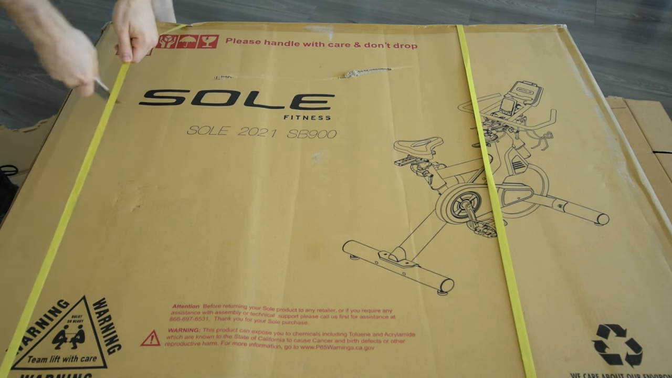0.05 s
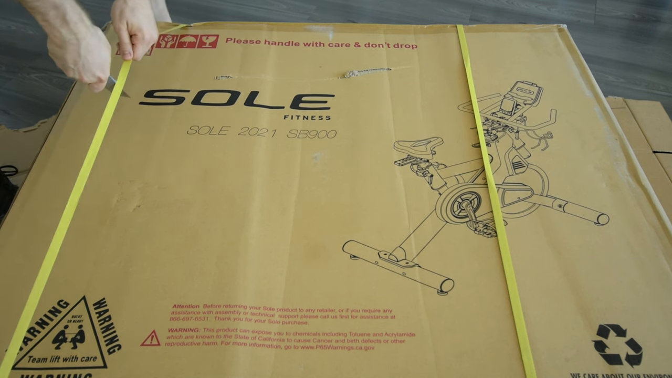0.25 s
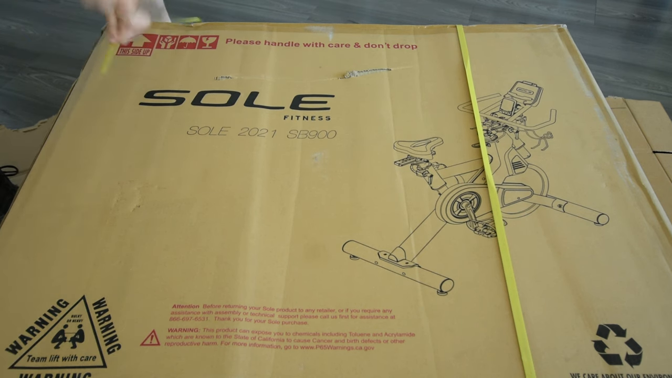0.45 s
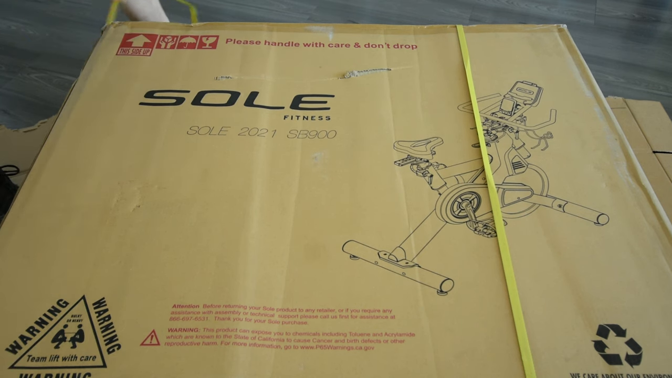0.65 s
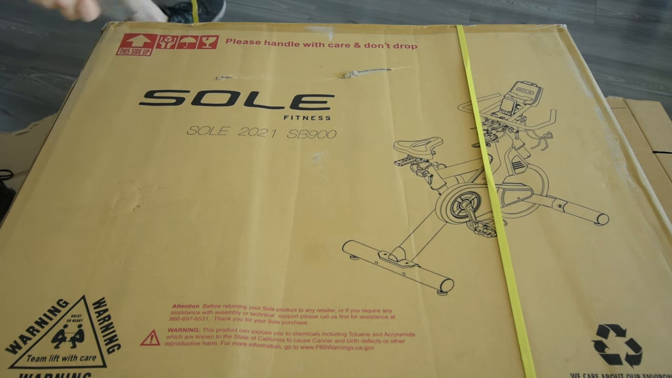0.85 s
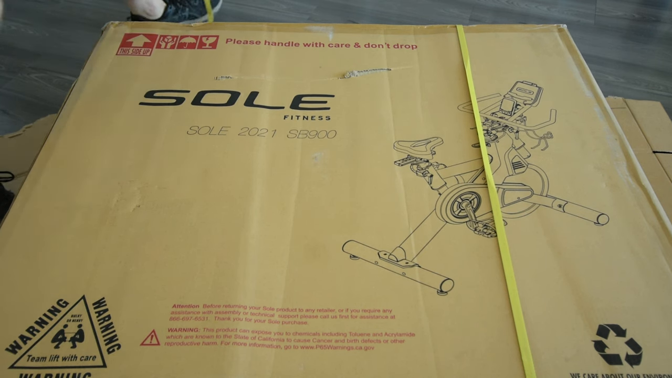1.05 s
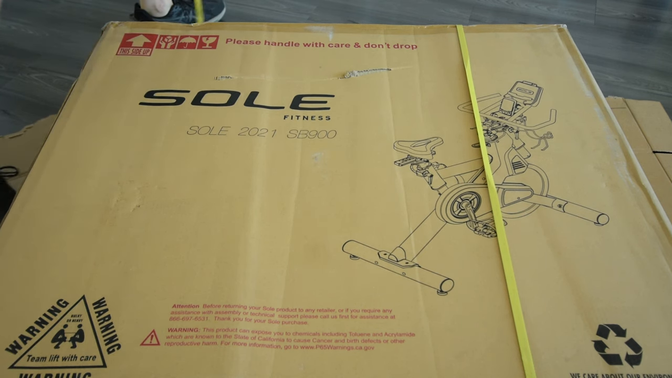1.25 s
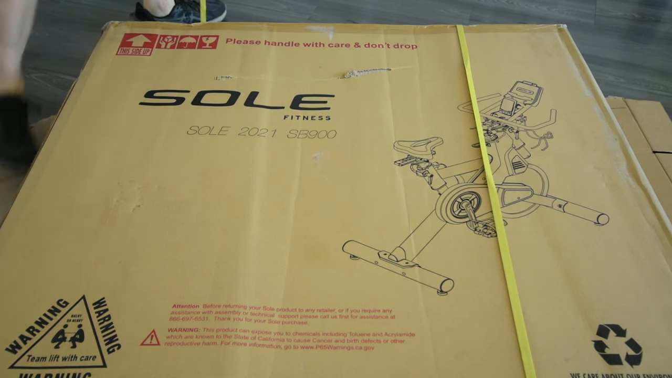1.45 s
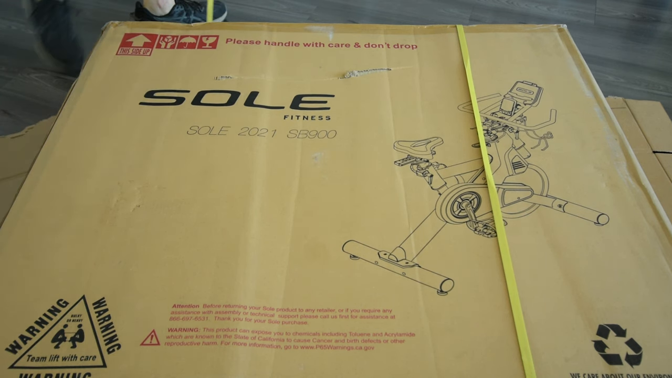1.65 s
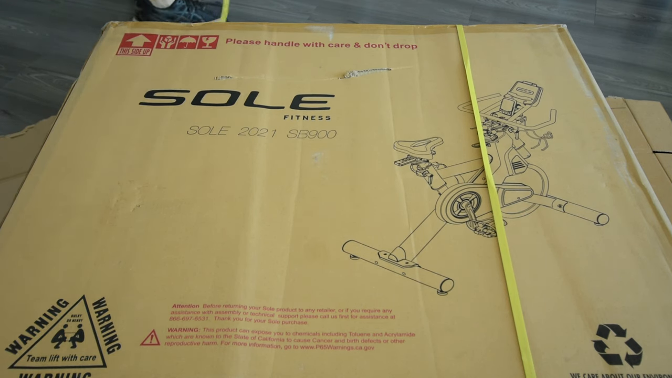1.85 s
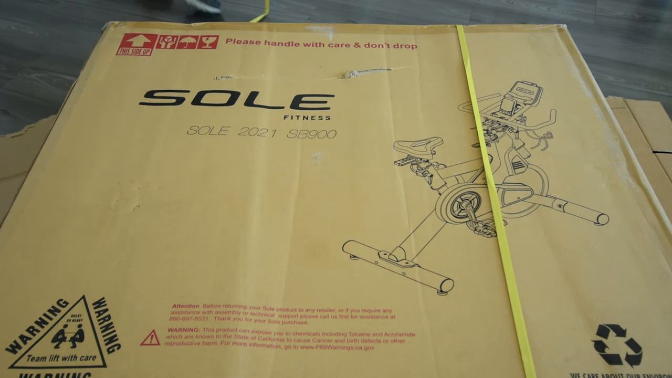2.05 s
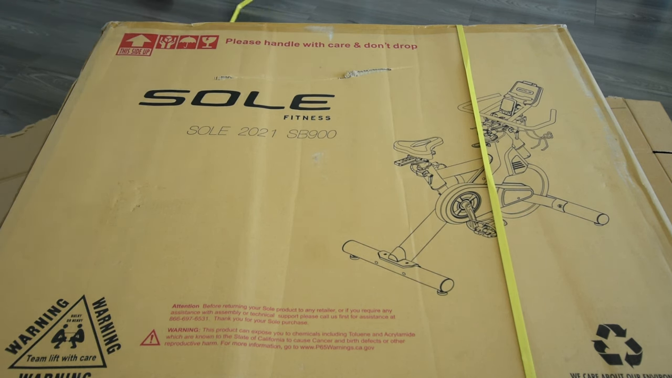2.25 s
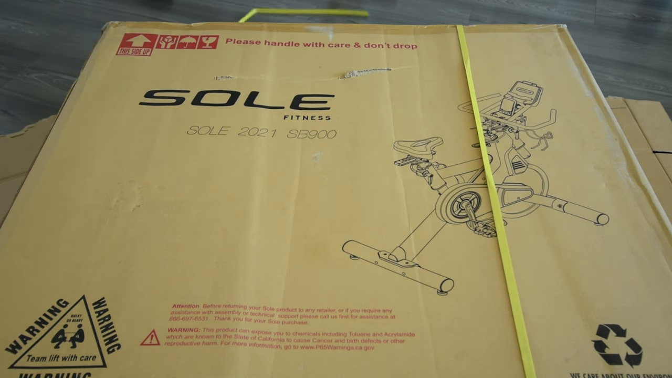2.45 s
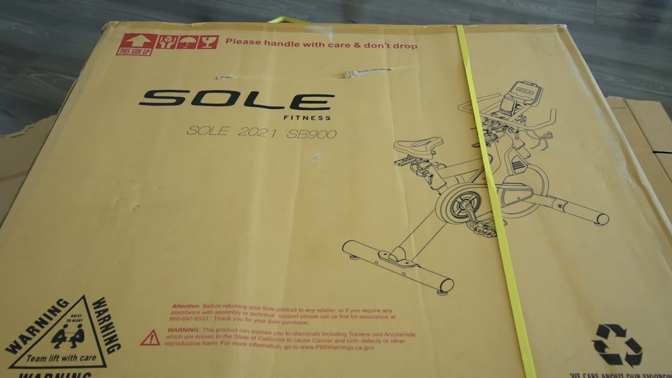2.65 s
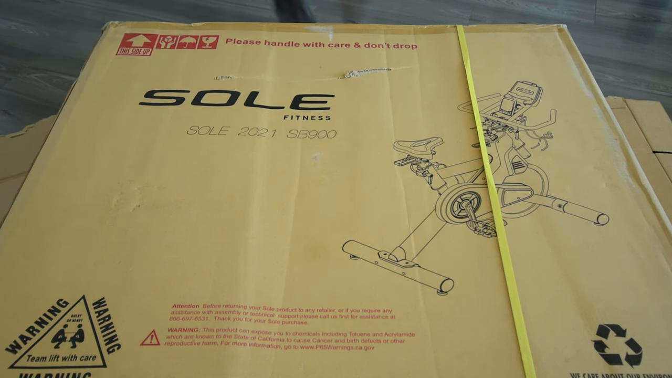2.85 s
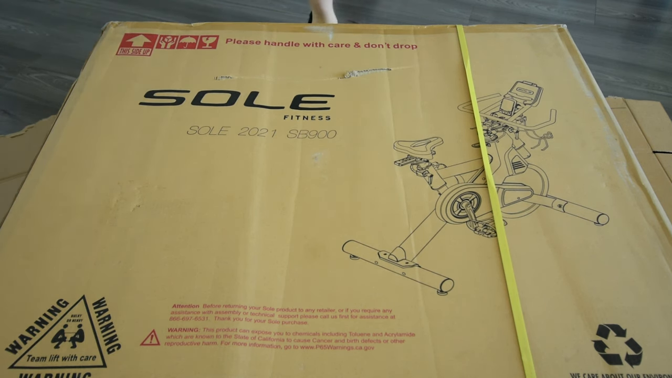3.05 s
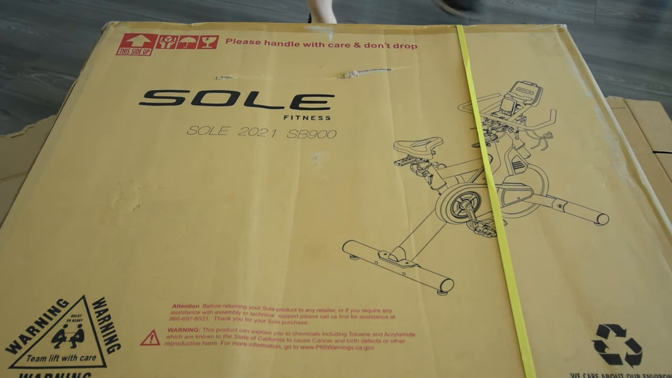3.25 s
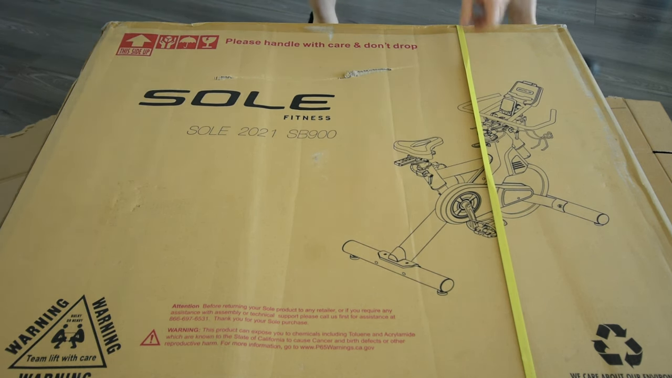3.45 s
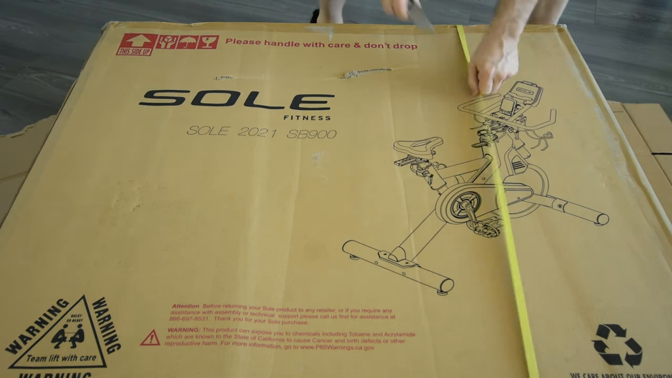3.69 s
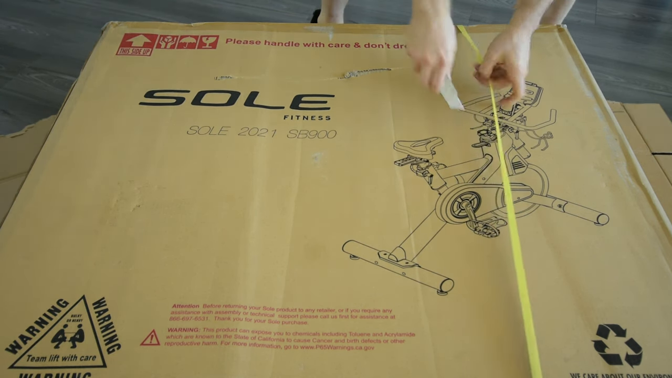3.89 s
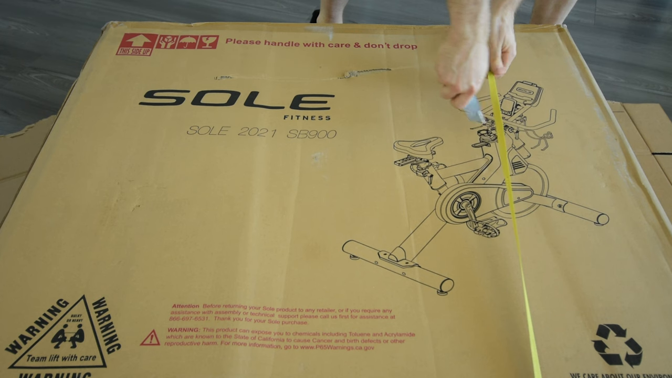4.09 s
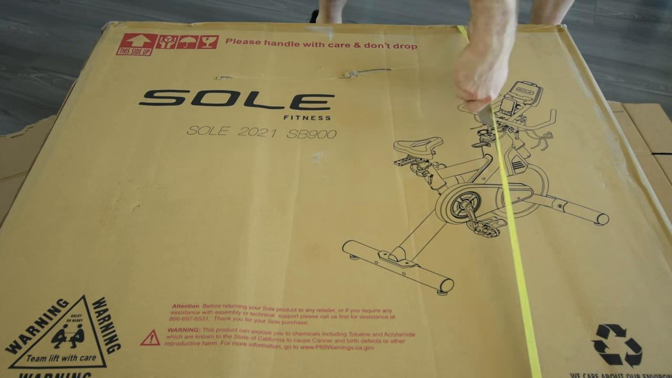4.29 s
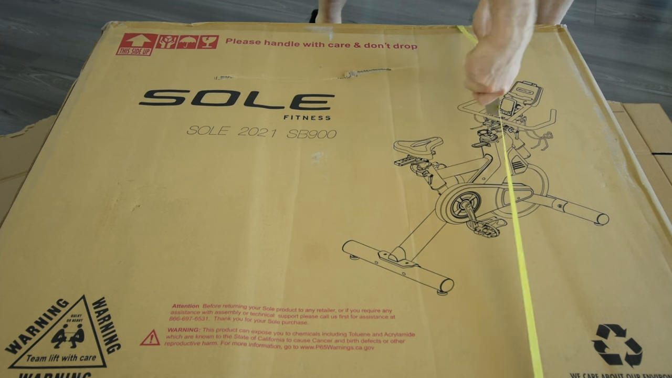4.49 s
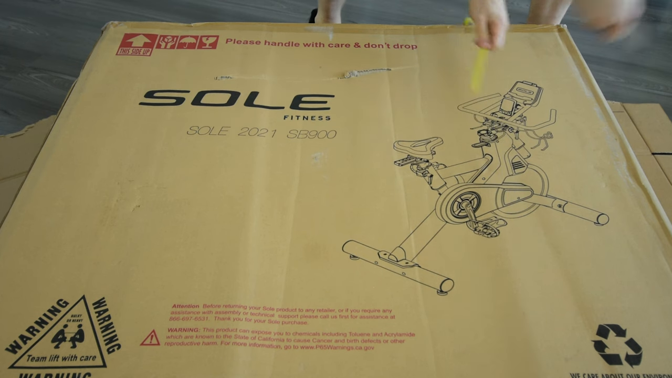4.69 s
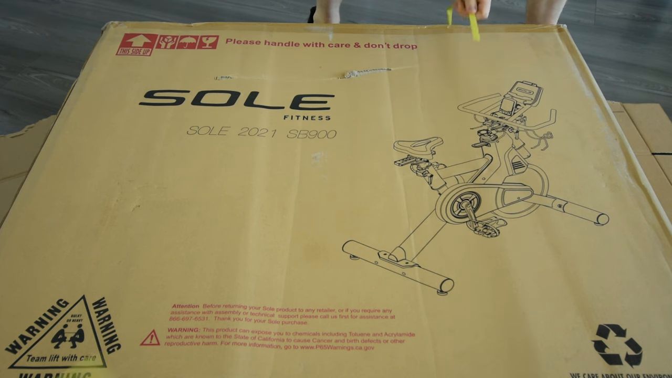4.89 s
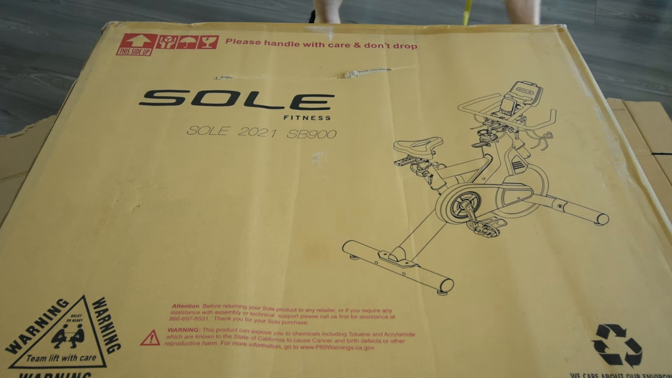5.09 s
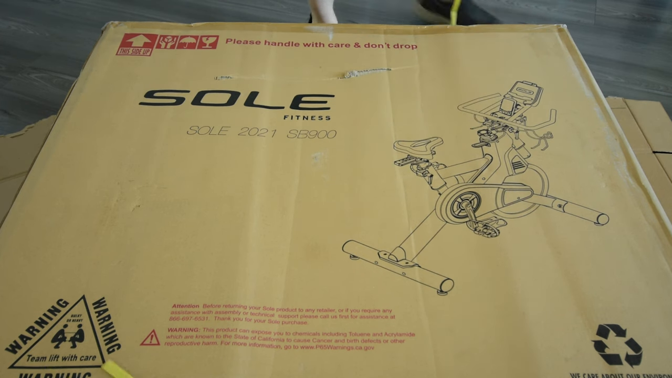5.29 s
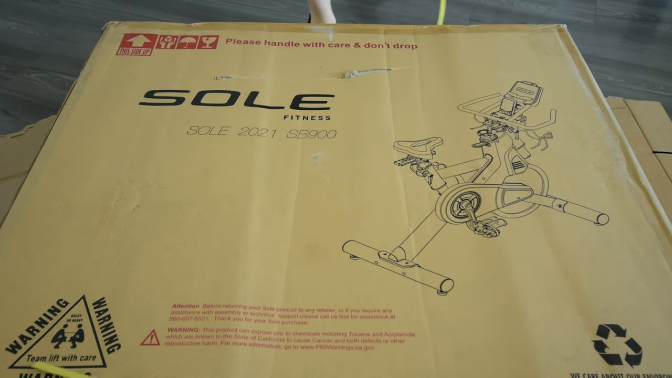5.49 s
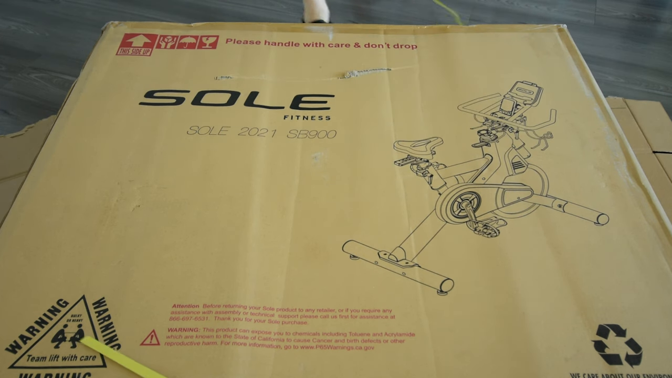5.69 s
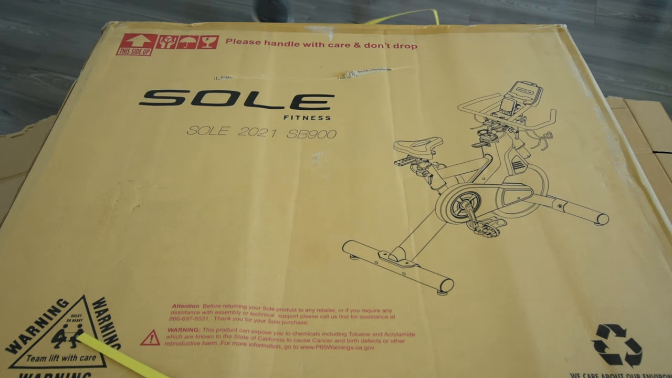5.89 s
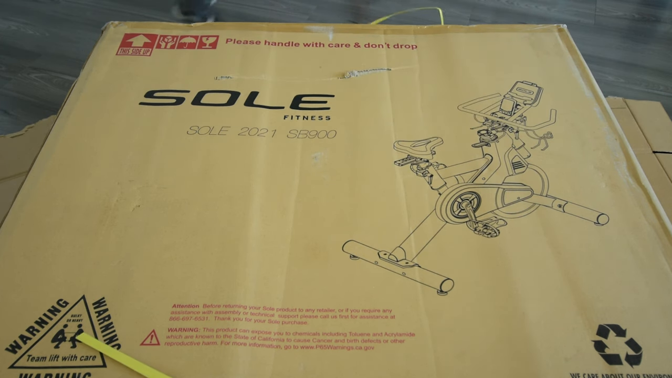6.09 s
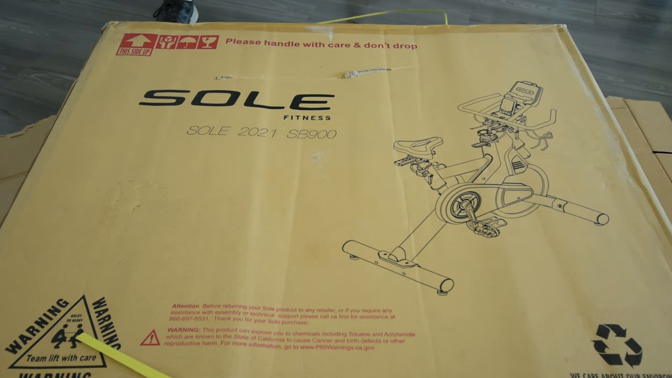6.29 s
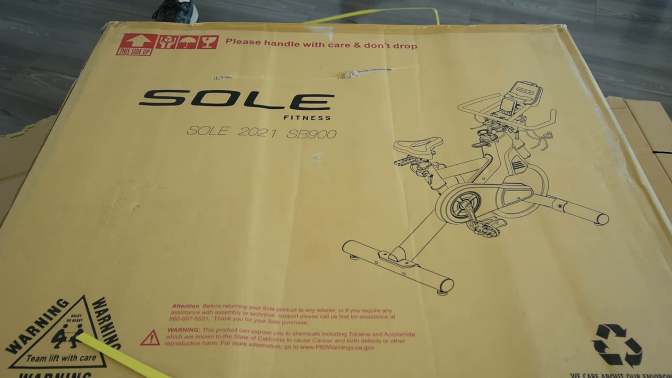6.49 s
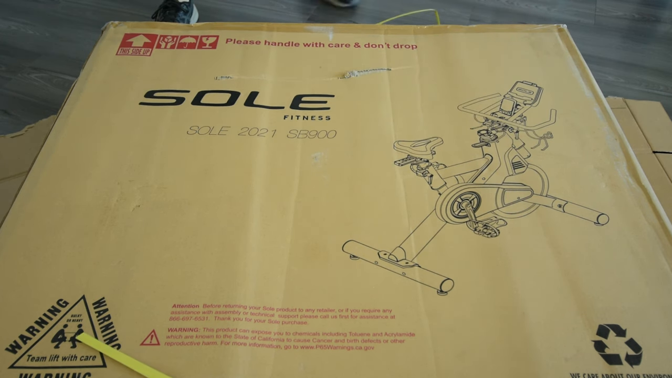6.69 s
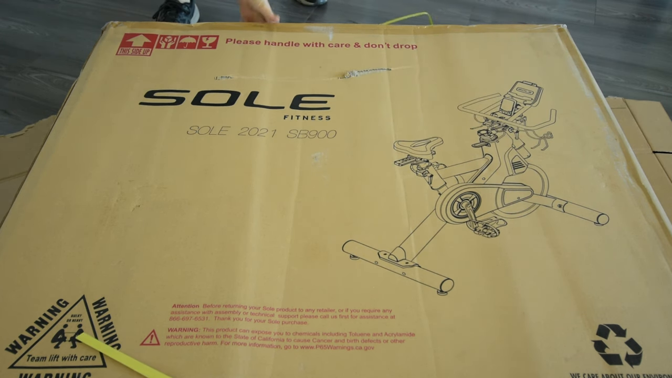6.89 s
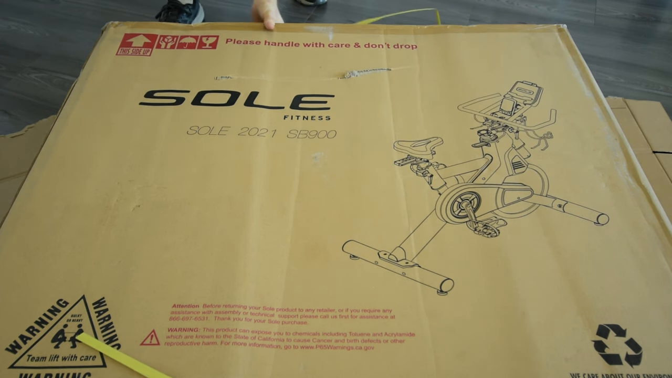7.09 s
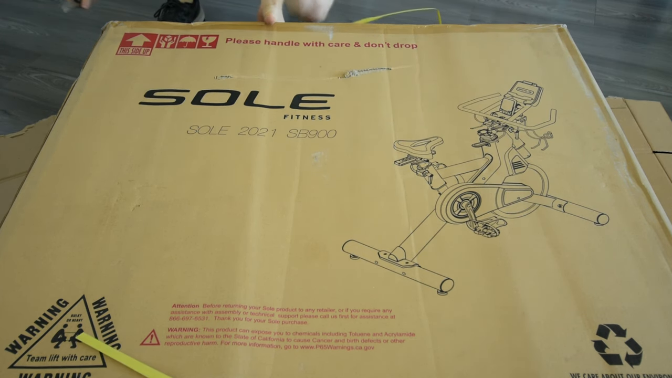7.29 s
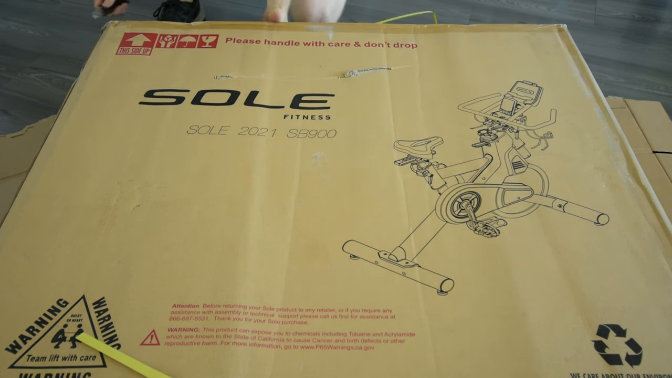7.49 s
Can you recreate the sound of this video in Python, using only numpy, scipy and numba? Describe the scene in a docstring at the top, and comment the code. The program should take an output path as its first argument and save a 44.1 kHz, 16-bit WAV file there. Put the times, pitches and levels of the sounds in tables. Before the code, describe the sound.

Two taut plastic packing straps are cut and snap hard against a large cardboard box in a ringing room, with scrapes, ticks and a dragged strap between.

```python
"""A fan's narrow hum and low rumble are heard first, then the ticks of loose ends of a plastic strap.
Two taut straps round a large cardboard box are cut with a knife and lash the box: noise bursts and box modes.
Straps drag, one is hauled from under the box, soles step and a palm brushes past: friction noise in resonances.
A bare, ringing room adds a diffuse tail; one microphone with a limiter ducks under each snap."""
import sys
import numpy as np
from scipy import signal
from scipy.fft import rfft, irfft, next_fast_len
from scipy.io import wavfile
from scipy.ndimage import uniform_filter1d, minimum_filter1d
from numba import njit

SR = 44100
rng = np.random.default_rng(int(sys.argv[2]) if len(sys.argv) > 2 else 0)


def generate_wav(sig):
    """Save sig (samples, or channels by samples) to the path in sys.argv[1] as 16-bit PCM at SR."""
    pcm = np.round(np.clip(np.atleast_2d(sig).T, -1, 1) * 32767).astype(np.int16)
    wavfile.write(sys.argv[1], SR, pcm)


N = 332758

# modes of the cardboard box: nominal [f/Hz, relative level/dB, t60/s]
BOX_MODES = [(105, -13, 0.21), (176.7, -6.5, 0.12), (244, 2.5, 0.057), (302, 0, 0.081), (380, 5, 0.057),
             (458, -1, 0.052), (564.5, -3, 0.083), (650, -7.5, 0.041)]
# resonances of the air in the box, nominal: [f/Hz, width/Hz, relative level/dB]
HOLLOW = [(258, 136, -7), (302, 49, 3), (355, 8.5, -1)]
# straps and soles slide in swells: [peak t/s, swell/s, hiss level/dB, hiss f/Hz,
# rasp level/dB, rasp f/Hz, box rumble level/dB]
SLIDES = [(.15, 0.028, -72, 4000, -57.5, 1500, -58), (.79, 0.017, -51.5, 10100, -61, 1140, -55),
          (0.902, 0.051, -39, 5900, -49, 1300, -49), (1.05, 0.045, -46, 6300, -57, 1630, -74),
          (1.15, 0.041, -47.5, 7400, -59, 1481, -72), (1.42, 0.15, -59.5, 4800, -66, 1200, -65),
          (2.231, 0.038, -40, 8300, -42, 806, -44), (2.62, 0.025, -52, 3900, -70, 930, -51),
          (2.84, 0.16, -53, 3250, -55.5, 1920, -63), (3.581, 0.048, -41, 3900, -60, 1300, -41),
          (3.75, 0.072, -43.5, 5800, -72, 1800, -44), (3.85, 0.0071, -44, 9000, -76, 900, -33.5),
          (3.97, 0.059, -42, 5500, -85, 680, -39), (4.29, 0.024, -53.5, 9000, -72, 800, -51),
          (4.45, 0.062, -61, 4000, -78, 800, -44.5), (4.58, 0.079, -41, 4490, -65, 1220, -48),
          (5.09, 0.073, -40.5, 4230, -57, 1110, -34.5), (5.31, 0.056, -47, 4140, -57, 880, -47.5),
          (5.5, 0.065, -38.5, 7500, -54, 1300, -50), (5.72, 0.022, -57, 5000, -45.5, 650, -63),
          (5.97, 0.064, -78, 6200, -60, 1580, -57), (6.3, 0.037, -75, 3500, -49, 680, -71),
          (6.59, 0.017, -52, 4000, -39, 1300, -47), (6.629, 0.024, -48.5, 3900, -35.5, 1000, -47.5),
          (6.7, .03, -41.5, 3300, -39.5, 1090, -40), (7.27, 0.03, -43, 3500, -42.5, 1890, -52),
          (7.4, 0.052, -47.5, 6280, -90, 770, -51.5), (7.54, 0.022, -40, 5250, -49, 740, -57)]


def undb(db):
    """Level law: amplitude ratio of a value in dB."""
    return 10 ** (np.asarray(db) / 20)


def unit(x):
    """Power normalisation: scaled to rms 1."""
    return x / np.sqrt(np.mean(x ** 2))


def colour(x, points):
    """Linear filtering in the frequency domain: [f/Hz, level/dB] points joined on a log-frequency axis."""
    hz, db = np.transpose(points)
    size = next_fast_len(len(x))
    f = np.maximum(np.arange(size // 2 + 1) * SR / size, 1)
    gain = undb(np.interp(np.log(f), np.log(hz), db))
    return irfft(rfft(x, size) * gain, size)[:len(x)]


def band(x, hz, width_hz):
    """Simple resonator: two poles, gain 1 at the centre."""
    return signal.lfilter(*signal.iirpeak(min(hz, .45 * SR), hz / width_hz, fs=SR), x)


def steep(x, hz, width_hz):
    """Resonators in cascade: the same one applied twice for steeper skirts."""
    return band(band(x, hz, width_hz), hz, width_hz)


@njit
def sweep(x, hz, sharp):
    """State-variable resonator: a band-pass whose centre moves; width = centre / sharp."""
    y, b, l = np.empty(len(x)), 0., 0.
    for i in range(len(x)):
        g = np.tan(np.pi * hz[i] / SR)
        v = (b + g * (x[i] - l)) / (1 + g * (g + 1 / sharp))
        b, l, y[i] = 2 * v - b, l + 2 * g * v, v / sharp
    return y


def steep_sweep(x, hz, sharp):
    """Moving resonators in cascade: the same sweep applied twice."""
    return sweep(sweep(x, hz, sharp), hz, sharp)


def walk(rate):
    """Slow random modulation: levels held 1 / rate s and smoothed twice; spread about 0.5."""
    k = int(SR / rate)
    held = np.repeat(rng.standard_normal(N // k + 1), k)
    return 0.74 * uniform_filter1d(uniform_filter1d(held, k), k)[:N]


def swell(s, rise_s, fall_s, t=np.arange(N) / SR):
    """Gaussian envelope: bell-shaped gain at times t with its top at s."""
    return np.exp(-.5 * ((t - s) / np.where(t < s, rise_s, fall_s)) ** 2)


def grains(grain_db, flutter_db):
    """Stick-slip friction: noise in grains of 40 samples (about 1 ms), uneven in size, under a quick flutter."""
    size_db = grain_db * np.repeat(rng.exponential(size=N // 40 + 1), 40)[:N]
    return rng.standard_normal(N) * undb(size_db + flutter_db * walk(40))


AIR_DB, RUMBLE_DB = -51, -45
HUM_HZ, HUM_WIDTH_HZ, HUM_DB = 221.9, 19.3, -49.5  # width of each of two passes


def air():
    """Stationary noise: room tone, building rumble and a fan's hum that wavers as narrow-band noise does."""
    # room tone spectrum: [f/Hz, relative level/dB per Hz]
    tone_spectrum = [(150, -8), (270, -9), (400, -11), (600, -13), (1200, -23), (4000, -28), (9000, -33.5),
                     (13000, -31), (16000, -31)]
    # building rumble spectrum: [f/Hz, relative level/dB per Hz]
    rumble_spectrum = [(12, -48), (20, 15.5), (65, 1), (77, -6.5), (86, -48), (103, -7), (141, -51),
                       (190, -16), (250, -55), (420, -120)]
    hum = steep(rng.standard_normal(N), HUM_HZ, HUM_WIDTH_HZ)
    tone = unit(colour(rng.standard_normal(N), [(75, -55)] + tone_spectrum))
    rumble = unit(colour(rng.standard_normal(N), rumble_spectrum + [(400, -75)]))
    return undb(AIR_DB + 0.38 * walk(1.0)) * tone + undb(RUMBLE_DB) * rumble + undb(HUM_DB) * unit(hum)


SLIDE_RISE = 0.75  # a slide sets in faster than it dies away


def slide_levels(t):
    """Superposed envelopes: gains of hiss, rasp and rumble at times t, summed over the swells."""
    swells = np.array([swell(s, SLIDE_RISE * w, w, t) for s, w, *_ in SLIDES])
    return undb(np.transpose(SLIDES)[2::2]) @ swells


TICK_SLAP_HZ, TICK_THUD_DB = 2240, -13  # a tick slaps high on the cardboard; its thud is set below the slap
KNOCK_EDGE_HZ = 2600
BITE_HZ, BITE_SLAP_DB = 4130, -17  # slap level relative to the crack
CRACKLE_PER_S, CRACKLE_DB, CRACKLE_SCATTER_DB = 4, 11, 2.5  # sliding strap, levels relative to its hiss


def small_blows():
    """Impulsive excitation: ticks, knocks, bites and chance crackle.
    Rows are (t/s, crack dB, crack Hz, slap dB, slap Hz, thud dB)."""
    # loose strap ends tick: [t/s, plastic crack level/dB, crack f/Hz, relative cardboard slap level/dB]
    tick_table = [(.122, -51, 7000, -52), (.237, -48, 9000, -58), (0.344, -36, 3060, -24),
                  (1.4263, -35, 11000, -63), (1.9779, -16.5, 6340, -24), (1.9899, -13, 8200, -33),
                  (2.0018, -32, 7240, -28), (2.0316, -7, 6000, -28), (2.0363, -13, 5700, -23.5),
                  (2.16, -26.5, 5620, -45), (2.3481, 2.5, 10100, -33.5), (2.827, -40, 6500, -43),
                  (3.007, -13, 8360, -16.5), (3.0136, 0, 3900, -18.5), (3.0211, 0.5, 7100, -13),
                  (3.701, -22, 5290, -40), (3.7469, -18.5, 4000, -32), (4.247, -32, 11600, -53),
                  (5.0547, -19, 6030, -29.5), (5.245, -36, 6000, -39.5), (5.2773, -28, 4400, -43),
                  (5.561, -22, 3760, -31.5), (5.6092, -19, 4210, -29), (5.6219, -11, 9800, -22.5),
                  (5.635, -11, 8160, -25.5), (5.6423, -9, 3680, -60), (5.686, -5, 6400, -29.5),
                  (5.8603, -29, 4440, -43), (5.905, -7.5, 6170, -27), (5.955, -44, 7000, -35),
                  (5.9857, -27, 7800, -42), (6.0127, -23.5, 4070, -55), (6.0434, -20, 4350, -58),
                  (6.0774, -25.5, 3440, -44), (7.0821, -15, 9080, -34), (7.276, -28, 3400, -48),
                  (7.29, -26, 3170, -34), (7.298, -26, 3000, -33.5), (7.373, -36, 6000, -46),
                  (7.3984, -20.5, 9150, -39.5), (7.427, -23.5, 8700, -40), (7.5227, -29, 8000, -52),
                  (7.536, -27, 11000, -47)]
    # hands, shoes and strap knock on the box: [t/s, edge level/dB, relative cardboard slap level/dB,
    # slap f/Hz, relative box thud level/dB]
    knock_table = [(0.3128, -29, -34, 1510, -42), (2.4259, -27, -32.5, 630, -39),
                   (2.452, -42, -26.5, 2500, -44), (2.5043, -34, -28.5, 650, -49),
                   (2.5144, -47, -27, 720, -40), (2.9835, -30, -20, 1110, -29.5),
                   (3.002, -34, -26, 1400, -57), (3.4781, -40, -28, 590, -28), (3.52, -42, -48, 1500, -43),
                   (3.5445, -30, -29, 630, -43), (3.5678, -17, -16.5, 1220, -22.5),
                   (3.5818, -24, -47, 630, -26.5), (3.5961, -18, -43, 743, -30),
                   (3.9224, -24, -63, 596, -28.5), (4.365, -32, -49.5, 600, -41.5),
                   (4.4591, -32, -40, 600, -35), (5.0786, -24, -32, 993, -41),
                   (5.0921, -24, -23.5, 2130, -27.5), (6.2029, -49, -36.5, 716, -38),
                   (6.3127, -81, -46, 711, -38), (6.7397, -23, -34.5, 403, -27),
                   (7.2031, -47, -33, 2540, -51), (7.244, -32, -29.5, 1930, -58),
                   (7.3649, -27, -40, 535, -32.5), (7.4659, -18, -33, 523, -39)]
    # the blade bites through the fibres of the second strap: [t/s, level/dB]
    bite_table = [(4.4713, -16.5), (4.5098, -21), (4.5264, -21), (4.5542, -26), (4.5644, -27),
                  (4.5765, -26), (4.5862, -22), (4.5954, -15.5)]

    def tick(s, db, hz, slap_db):
        return s, db, hz, slap_db, TICK_SLAP_HZ, slap_db + TICK_THUD_DB

    when, pitch, size = rng.random((int(CRACKLE_PER_S * N / SR), 3)).T
    s = when * N / SR
    hiss_db = 20 * np.log10(slide_levels(s)[0] + 1e-6)
    db = hiss_db + CRACKLE_DB - CRACKLE_SCATTER_DB * np.log(size)
    crackle = zip(s, db, 3200 * 3 ** pitch)
    return ([tick(*row) for row in tick_table]
            + [(s, edge_db, KNOCK_EDGE_HZ, slap_db, hz, thud_db)
               for s, edge_db, slap_db, hz, thud_db in knock_table]
            + [tick(s, db, BITE_HZ, db + BITE_SLAP_DB) for s, db in bite_table]
            + [tick(s, db, hz, db + BITE_SLAP_DB) for s, db, hz in crackle])


def blows(table, crack_s, slap_s, sideways_db, boom_hz=330, boom_width_hz=330):
    """Impact excites modes: each blow is a plastic crack, a cardboard slap and a ring of the box.
    Returns the direct sound and the smoother sum over all directions that fills the room."""
    out, t = np.zeros((2, N + SR)), np.arange(SR // 8) / SR
    noise = rng.standard_normal((len(table), len(t)))
    spread = rng.standard_normal((len(table), len(BOX_MODES), 3))
    above = signal.butter(2, 2600, "high", fs=SR, output="sos")
    rise = np.minimum(t / 0.00068, 1)
    impulse = t == 0
    for (s, crack_db, crack_hz, slap_db, slap_hz, thud_db), n, chance in zip(table, noise, spread):
        # over all directions the crack's centre is drawn towards 5200 Hz
        pair = (n * rise * np.exp(-t / crack_s), crack_hz), (impulse, np.sqrt(crack_hz * 5200))
        crack = [signal.sosfilt(above, steep(x, hz, 1.6 * hz)) for x, hz in pair]
        slap = [steep(x, slap_hz, 2.0 * slap_hz) for x in (n[::-1] * np.exp(-t / slap_s), impulse)]
        # chance sets the pitch, strength and sign of each mode: where the blow lands
        ring = 0
        for (f, db, t60), (a, b, c) in zip(BOX_MODES, chance):
            mode = np.sin(2 * np.pi * f * (1 + 0.062 * b) * t) * 1000 ** (-t / t60)
            ring = ring + np.sign(c) * undb(db + 0.94 * a) * mode
        thud = ring, steep(impulse, boom_hz, boom_width_hz)
        i = int(s * SR)
        # slap and thud columns are relative: fixed lifts make them peak levels
        parts = (crack, crack_db, sideways_db), (slap, slap_db + 11.5, 0), (thud, thud_db + 7.5, 0)
        for (straight, around), db, more_db in parts:
            gain = undb(db) / np.abs(straight).max()
            out[0, i:i + len(t)] += gain * straight
            out[1, i:i + len(t)] += gain * undb(more_db) * np.std(straight) * around / np.std(around)
    return out[:, :N]


def slides():
    """Friction drives resonators: hiss on plastic, rasp on cardboard, rumble in the box; the colour moves."""
    # colour of plastic rubbing: [f/Hz, relative level/dB per Hz]
    plastic_spectrum = [(1410, -41), (2400, -3.5), (3960, -9), (5570, -15), (6030, -16), (9860, -14.5),
                        (14300, -9), (16000, -44)]
    t = np.arange(N) / SR
    s, _, _, hiss_hz, _, rasp_hz, _ = np.transpose(SLIDES)
    hiss_hz, rasp_hz = (np.interp(t, s, hz) for hz in (hiss_hz, rasp_hz))
    rub = grains(grain_db=1.5, flutter_db=2.5)
    plastic = colour(rub, plastic_spectrum)
    hiss = undb(-9) * plastic + sweep(plastic, hiss_hz, 2.5)
    rasp = steep_sweep(rub, rasp_hz, 1.3) / np.sqrt(rasp_hz)
    # a mode's bandwidth is inverse to its decay time
    rumble = sum(undb(db) * band(rub, hz, 2.3 / t60) for hz, db, t60 in BOX_MODES[2:])
    return np.sum(slide_levels(t) * [unit(hiss), unit(rasp), unit(rumble)], axis=0)


def steps():
    """Structure-borne vibration: soft soles make a low swell in the floor with no click."""
    # footfalls boom in the floor: [peak t/s, f/Hz, level/dB, swell/s]
    footfalls = [(1.5, 90, -42, 0.22), (2.5, 111, -45.5, 0.082), (3.62, 105, -33.5, 0.061),
                 (3.97, 105, -45, 0.11), (4.15, 91, -51, 0.6), (5.1, 118, -49, .04), (6.93, 90, -37, 0.048),
                 (7.3, 29.8, -31.5, 0.036), (7.54, 41, -50, 0.027)]
    n = rng.standard_normal(N)
    return sum(undb(db) * unit(steep(n, hz, 0.83 * hz)) * swell(s, swell_s, swell_s)
               for s, hz, db, swell_s in footfalls)


HAUL_HISS_DB, HAUL_CARD_DB, HAUL_BOX_DB = -23.5, -25, -16  # at speed level 0 dB, before the box lifts
CARD_FOLLOWS, LIFT_DB_PER_S = 0.76, 44  # dB of card per dB of speed; box fades as it lifts off the strap


def haul():
    """Forced resonance: a strap hauled from under the box speeds up, then slows, sounding face and hollow."""
    # pull of the strap: [t/s, speed level/dB]
    pull = [(1.536, -22), (1.554, -8), (1.66, -0.5), (1.75, 0.5), (1.8, -3.5), (1.86, -13)]
    # colour of its hiss: [f/Hz, relative level/dB per Hz]
    hiss_spectrum = [(1290, -39), (2200, -2.5), (2350, -4.5), (3970, -11), (9890, -15), (14400, -20),
                     (16000, -22)]
    # cardboard face under the strap: nominal [f/Hz, width/Hz, relative level/dB]
    face = [(844, 150, 1.5), (1300, 220, 4.5), (1700, 325, 1), (2200, 440, -30)]
    t, (s, db) = np.arange(N) / SR, np.transpose(pull)
    speed_db = np.interp(t, s, db)
    moving = uniform_filter1d(1. * ((t > s[0]) & (t < s[-1])), SR // 250)
    rub = grains(grain_db=-0.6, flutter_db=2.2)
    card, box = (sum(undb(db) * steep(rub, hz, 1.22 * width) for hz, width, db in body)
                 for body in (face, HOLLOW))
    hiss = undb(HAUL_HISS_DB + speed_db) * unit(colour(rub, hiss_spectrum))
    card = undb(HAUL_CARD_DB + CARD_FOLLOWS * speed_db) * unit(card)
    box_db = HAUL_BOX_DB + speed_db - LIFT_DB_PER_S * np.clip(t - s[0], 0, 1)
    return moving * (hiss + card + undb(box_db) * unit(box))


SCUFF_SAG_PER_S = 3  # fraction of the centre frequency, within 0.05 s of the peak


def squeak():
    """Band-limited friction: short scuffs and a squeak, sagging in pitch, with no click."""
    # scuffs: [peak t/s, f/Hz, width of one pass/Hz, level/dB before the swell, swell/s]
    scuffs = [(3.848, 690, 646, -33, 0.0086), (3.958, 650, 696, -36, 0.0071),
              (5.41, 2350, 450, -43.5, 0.016)]
    t, n = np.arange(N) / SR, rng.standard_normal(N)
    out = 0
    for s, hz, width, db, swell_s in scuffs:
        sagging_hz = hz * (1 - SCUFF_SAG_PER_S * np.clip(t - s, -.05, .05))
        rub = unit(steep_sweep(n, sagging_hz, hz / width))
        out = out + undb(db) * rub * swell(s, swell_s, swell_s)
    return out


BRUSH_S, BRUSH_RISE_S, BRUSH_FALL_S, BRUSH_DB, BRUSH_BOX_DB = 6.97, 0.069, 0.059, -32, -31.5
GAP_RISE_PER_S, BRUSH_BOX_LEADS_S = 0.26, 0.02  # fractional rise of the bands; the box peaks early
GAP_WAVER_DB = 3  # scales a random walk of spread about 0.5


def brush():
    """Gap resonance: a palm brushes the box face, whistling in bands that rise as the gap under it narrows.
    The hollow of the box hums along."""
    # whistling bands: [f/Hz at the brush, width of one pass/Hz, relative level/dB, peaks early by t/s]
    gap_bands = [(1740, 1940, 1, -0.016), (4360, 1370, 2, -0.013), (5800, 1330, 0.5, 0.037),
                 (8000, 2900, -2.5, -0.0074), (10200, 2300, -5, 0.017), (13600, 6800, -6, 0.029)]
    rub = grains(grain_db=1.9, flutter_db=2.2)
    glide = 1 + GAP_RISE_PER_S * np.clip(np.arange(N) / SR - BRUSH_S, -.3, .2)

    def stroke(leads_s):
        return swell(BRUSH_S - leads_s, BRUSH_RISE_S, BRUSH_FALL_S)

    gap = [undb(db + GAP_WAVER_DB * walk(8)) * steep_sweep(rub, hz * glide, hz / width)
           for hz, width, db, _ in gap_bands]
    box = sum(undb(db) * steep(rub, 1.11 * hz, 2.8 * width) for hz, width, db in HOLLOW)
    # neighbouring bands alternate in sign
    whistle = sum((-1) ** k * stroke(gap_bands[k][3]) * sound for k, sound in enumerate(gap))
    whistle = whistle / np.std(sum(gap))
    return undb(BRUSH_DB) * whistle + undb(BRUSH_BOX_DB) * stroke(BRUSH_BOX_LEADS_S) * unit(box)


ROOM_DB, EARLY_DB, FLOOR_ECHO_DB = -3.5, -2, -10  # early: tail before the far wall, relative to after
FAR_WALL_S, FLOOR_ECHO_S = .027, .004


def room(x):
    """Reverberation: a quick floor echo and a diffuse tail, fuller once the far wall has answered."""
    # decay of the room: [f/Hz, t60/s, relative level/dB]
    decay = [(60.5, 0.57, 13), (248, 0.52, 2), (1000, 0.68, 4), (4000, 0.61, 6.5), (9000, 0.43, 0),
             (16100, 0.25, 9)]
    t = np.arange(SR) / SR
    hz, t60, db = np.transpose(decay)
    tail = 0
    for f in 45 * 2 ** np.arange(0, 8.6, .5):  # half-octave bands
        share = [(f / 2, -60), (f / 1.42, -30), (f / 1.19, -3), (f, 0),
                 (f * 1.19, -3), (f * 1.42, -30), (f * 2, -60)]
        fade = 1000 ** (-t / np.interp(np.log(f), np.log(hz), t60))
        gain = undb(np.interp(np.log(f), np.log(hz), db))
        tail = tail + gain * fade * colour(rng.standard_normal(SR), share)
    tail *= np.where(t < FAR_WALL_S, undb(EARLY_DB) * np.minimum(t / 0.006, 1), 1)
    tail *= undb(ROOM_DB) / np.sqrt(np.sum(tail ** 2))
    tail[int(FLOOR_ECHO_S * SR)] += undb(FLOOR_ECHO_DB)
    return signal.fftconvolve(x, tail)[:N]


def scene():
    """Superposition: blows and friction, direct and through the room, over floor vibration and room tone."""
    # a cut strap tears, lets go and lashes the box; at .773 s its loose end flutters:
    # [t/s, plastic crack level/dB, crack f/Hz, relative cardboard slap level/dB, slap f/Hz,
    # relative box thud level/dB]
    lash_table = [(.3345, -21, 4000, -26.5, 1440, -18), (.381, -17.5, 9000, -42, 1500, -17),
                  (.3945, 3.5, 6070, -5.5, 1300, 10), (.773, -37, 13000, -50, 1000, -60),
                  (4.611, -29, 3500, -35, 2200, -61), (4.616, -17, 9100, -49, 2000, -39),
                  (4.6258, 3, 8100, -6, 820, 7)]
    lashes = blows(lash_table, crack_s=0.00069, slap_s=0.023, sideways_db=14)
    ticks = blows(small_blows(), crack_s=.001, slap_s=.0025, sideways_db=0)
    straight, around = lashes + ticks
    friction = slides() + haul() + brush() + squeak()
    mono = straight + friction + room(around + undb(-2.5) * friction) + steps() + air()
    return np.array([mono, mono])


@njit
def peak_hold(x, fall):
    """Peak detection: follows each peak at once and lets go at a steady rate."""
    e, held = np.empty(len(x)), 0.
    for i in range(len(x)):
        held = max(x[i], held * fall)
        e[i] = held
    return e


LIMIT, RELEASE_DB_PER_S = .78, 110  # limit as a fraction of full scale, ahead of the top cut
MIC_LOW_HZ, TOP_HZ = 90, 15900


def record(dry):
    """Gain control: a limiter behind the microphone ducks under each snap and recovers as the room rings."""
    # microphone response: [f/Hz, level/dB]
    response = [(20, -0.5), (6500, -3), (9500, 1), (11500, -2), (16000, -7.5)]
    heard = np.array([colour(channel, response) for channel in dry])
    heard = signal.sosfilt(signal.butter(2, MIC_LOW_HZ, "high", fs=SR, output="sos"), heard)
    # the largest magnitude nearby, so that the gain falls ahead of a peak
    ahead = -minimum_filter1d(-np.abs(heard).max(axis=0), size=65)
    envelope = peak_hold(ahead, float(undb(-RELEASE_DB_PER_S / SR)))
    gain = LIMIT / np.maximum(envelope, LIMIT)
    limited = heard * uniform_filter1d(gain, size=33)
    return signal.sosfilt(signal.ellip(10, .2, 80, TOP_HZ, fs=SR, output="sos"), limited)


dry = scene()
out = record(dry)
generate_wav(out)
```